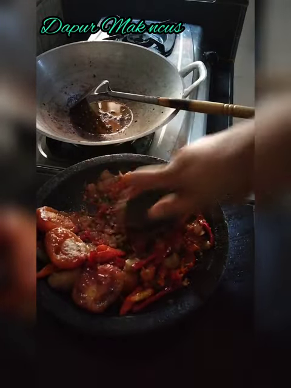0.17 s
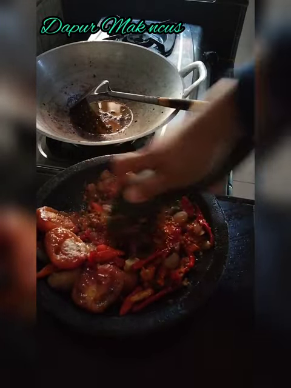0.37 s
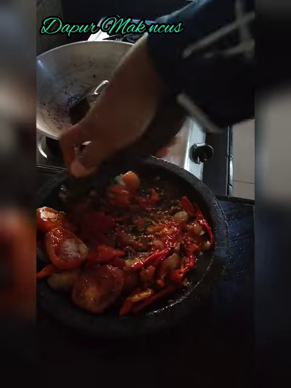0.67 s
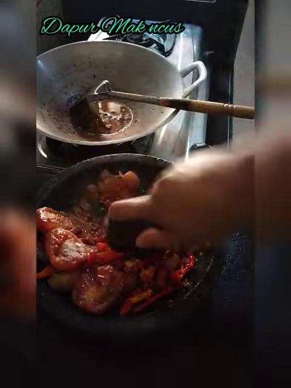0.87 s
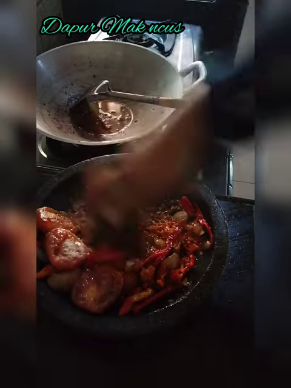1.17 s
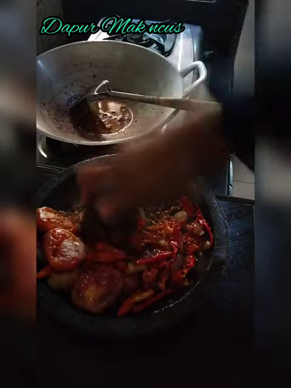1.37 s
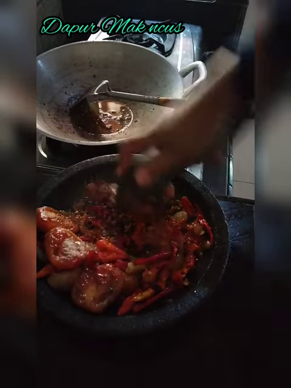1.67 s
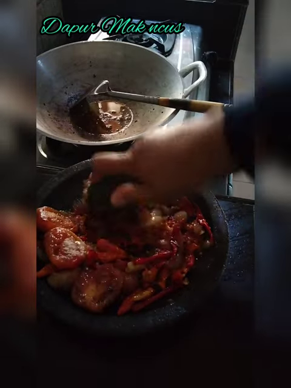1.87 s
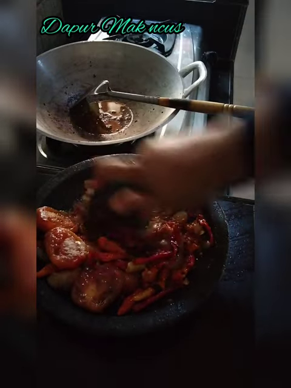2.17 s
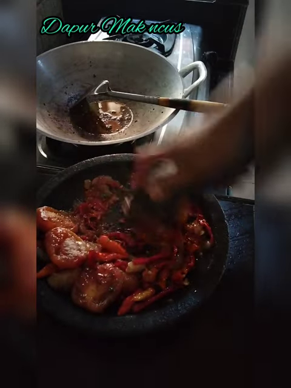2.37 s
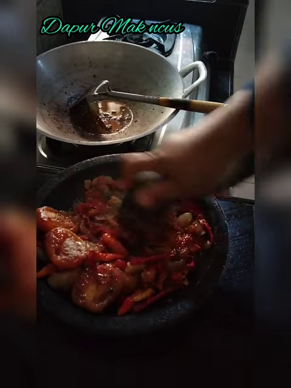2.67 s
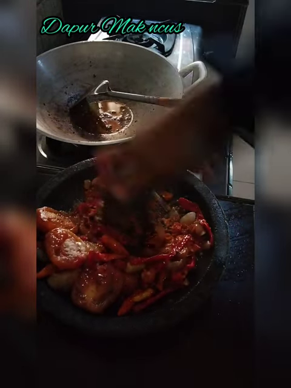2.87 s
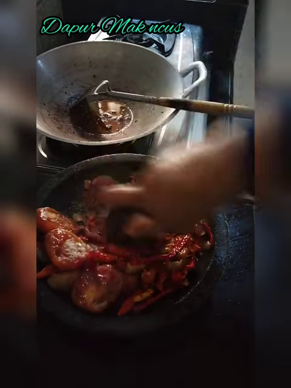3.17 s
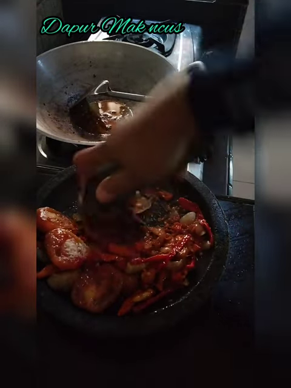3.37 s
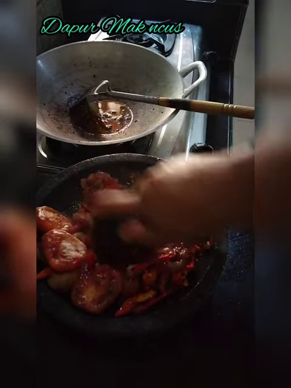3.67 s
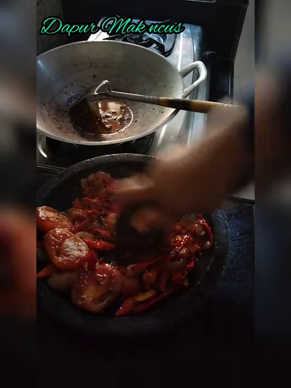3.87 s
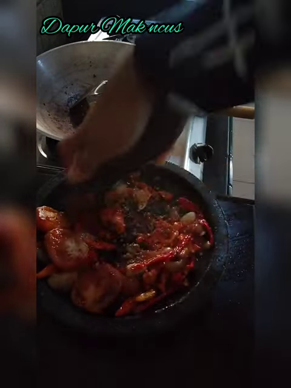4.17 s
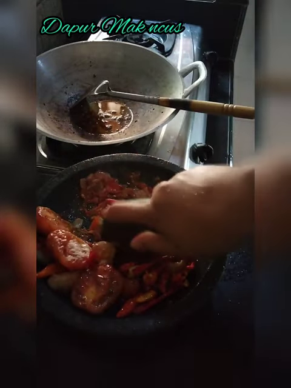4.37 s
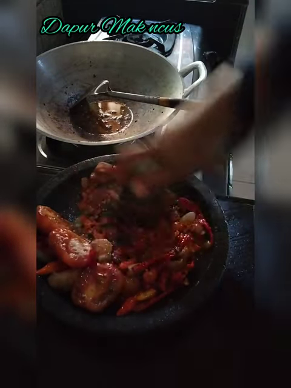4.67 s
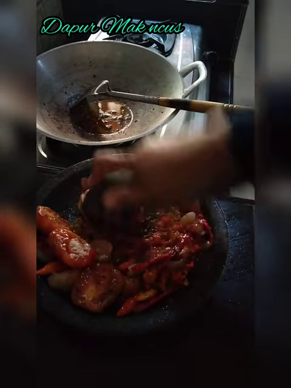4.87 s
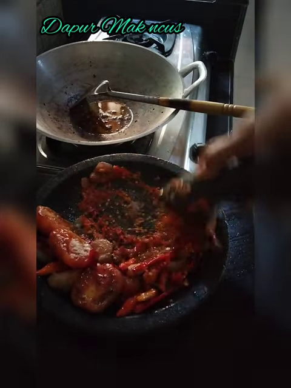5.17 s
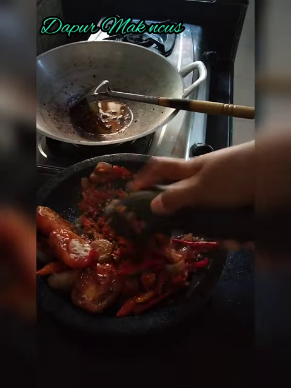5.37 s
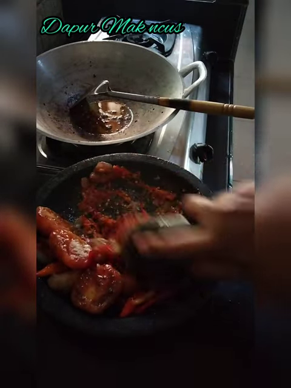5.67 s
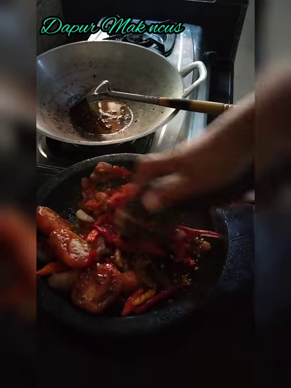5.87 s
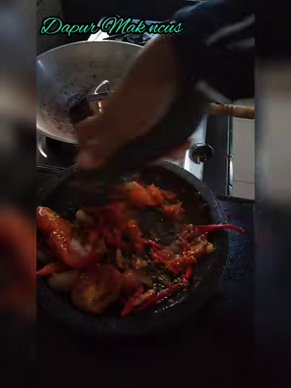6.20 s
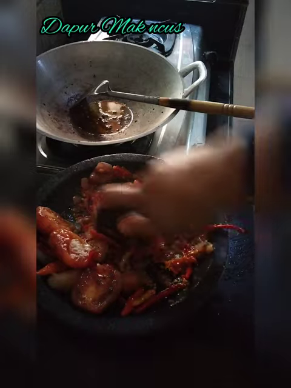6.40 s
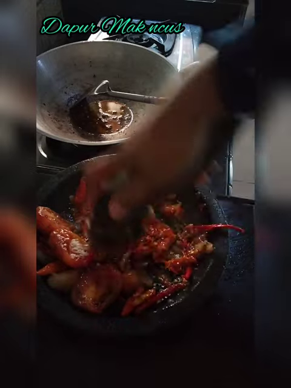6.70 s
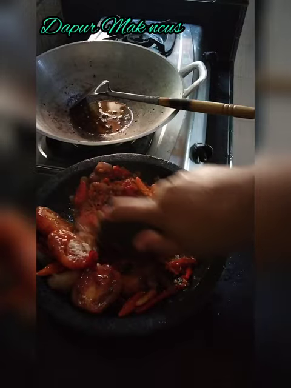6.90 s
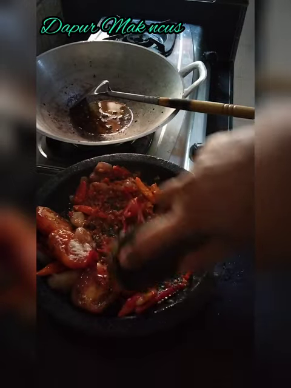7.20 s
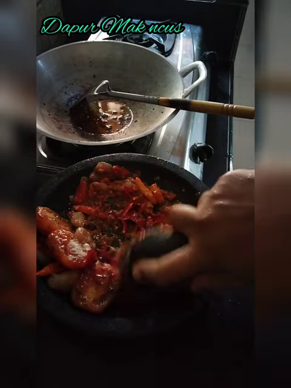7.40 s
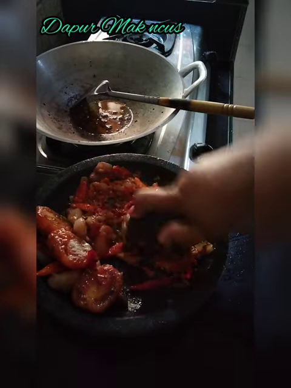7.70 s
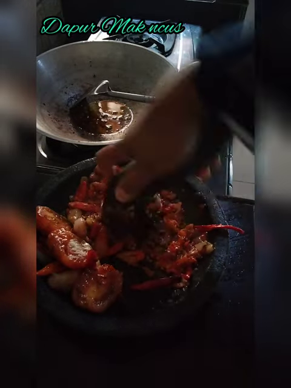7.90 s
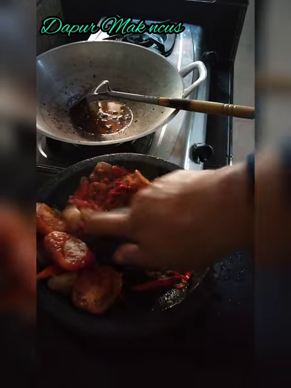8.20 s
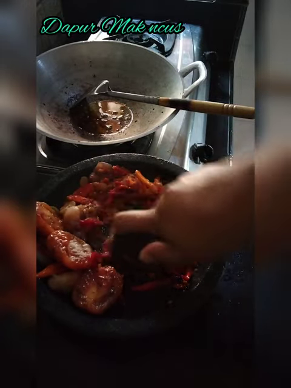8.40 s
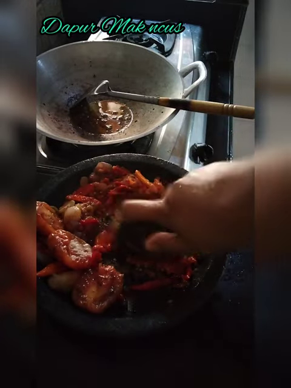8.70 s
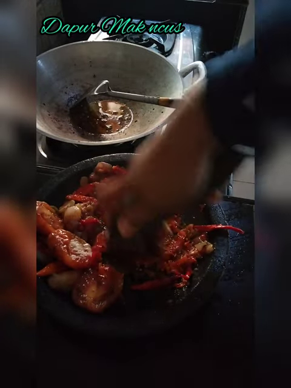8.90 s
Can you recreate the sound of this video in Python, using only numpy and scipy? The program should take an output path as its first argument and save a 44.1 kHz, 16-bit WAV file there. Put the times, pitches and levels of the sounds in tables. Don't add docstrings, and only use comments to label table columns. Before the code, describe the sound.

A stone pestle crushes wet, pulpy vegetables in a heavy stone mortar, squelching and scraping, with a few sharp, ringing stone knocks in a kitchen.

```python
import sys
import numpy as np
from scipy import signal
from scipy.fft import rfft, irfft, next_fast_len
from scipy.io import wavfile
from scipy.ndimage import uniform_filter1d, map_coordinates

SR = 44100
rng = np.random.default_rng(int(sys.argv[2]) if len(sys.argv) > 2 else 0)


def convert_level_to_amplitude(level_db):
    exponent = np.asarray(level_db, float) / 20
    return 10 ** exponent


def unload_wav(signal):
    wavfile.write(
        sys.argv[1],
        SR,
        np.round(np.clip(np.atleast_2d(signal).T, -1, 1) * 32767).astype(np.int16),
    )


N = 399105

# pitch_hz, level_db, t60_s (time to die away by 60 dB)
THUD_MODES = [(397, 1, 0.0078), (651, 4, 0.012), (850, 6.5, 0.011), (984, 7.5, 0.014), (1318, 2, 0.03)]
RING_MODES = [(1542, 5, 0.019), (1560, -18.5, 0.35)]
UPPER_MODES = [(1750, -12.5, 0.06), (2110, -2.5, 0.037), (2907, -2.5, 0.026), (2500, -10, 0.04),
               (5030, -22, 0.071)]
TOP_MODES = [(7430, 0.64, .06), (9300, -2, 0.028)]
RIM_MODES = [(3336, -6, 0.1), (3385, -5.5, 0.051)]
# opens_s, opening_time_s, starts_closing_s, closing_db_per_s, share the echo feels
GATE_STROKES = [(0.0, 0.03, 0.44, 125, .4), (0.573, 0.037, 0.87, 60, .4), (0.999, 0.021, 1.243, 194, .6),
                (1.412, .008, 2.082, 140, .3), (2.22, 0.002, 2.69, 140, .45),
                (2.891, 0.0022, 3.22, 224, .05), (3.33, 0.063, 3.9, 205, .5),
                (4.039, 0.018, 4.725, 148, .5), (4.948, 0.01, 5.14, 197, .6),
                (5.419, 0.021, 5.955, 170, .6), (6.138, 0.0088, 6.45, 187, .6),
                (6.631, 0.014, 6.9, 174, .6), (7.169, 0.0016, 7.77, 159, .25),
                (7.931, 0.0065, 8.66, 229.5, .6), (8.799, 0.0016, 8.99, 202, .6)]
# squelch_db, fizz_db, dull_scrape_db, bowl_ring_db, opening_burst_db
STROKE_LEVELS = [(-65.5, -68, -78, -70.5, -79), (-65, -66.5, -64, -67, -62), (-68, -67.5, -67, -77, -55),
                 (-68, -68, -88, -66, -62), (-65.5, -68, -71.5, -67.5, -72),
                 (-68.5, -64.5, -61.5, -76, -52), (-68.5, -71, -72, -69, -80),
                 (-68, -67.5, -70, -72.5, -84), (-67, -65, -84, -76, -52), (-69.5, -67.5, -83, -72, -68),
                 (-67, -68, -74, -75, -51.5), (-68, -72, -82.5, -70.5, -50),
                 (-68.5, -71, -69.5, -75, -66.5), (-66, -67, -76, -82, -45.5), (-65, -66, -80, -71, -49.5)]


def unit(x):
    return x / np.sqrt(np.mean(x ** 2) + 1e-20)


def along(points, hz):
    f, v = np.transpose(points)
    return np.interp(np.log(hz + 1), np.log(f + 1), v)


def wobble(rate):
    knots = rng.standard_normal(int(N * rate / SR) + 4)
    return map_coordinates(knots, [np.arange(N) * rate / SR], order=1)


def filtered(x, response):
    m = next_fast_len(N + SR // 2)
    return irfft(rfft(x, m) * response(np.fft.rfftfreq(m, 1 / SR)), m)[:N]


def clock():
    return np.arange(0, N + 32, 32) / SR


def smooth(gain):
    return np.interp(np.arange(N) / SR, clock(), gain)


def patchy(x, depth_db, bins=8, frames=10):
    z = signal.stft(x, nperseg=512)[2]
    field = uniform_filter1d(rng.standard_normal(z.shape), size=bins, axis=0)
    field = uniform_filter1d(field, size=frames, axis=1)
    return signal.istft(z * convert_level_to_amplitude(depth_db * unit(field)), nperseg=512)[1][:N]


def grit(spike_db, clump_db, clump_rate):
    size = convert_level_to_amplitude(spike_db * rng.exponential(size=N) + clump_db * wobble(clump_rate))
    return rng.standard_normal(N) * size


def crunch(hz, spread, cycles, count):
    when, pitch, size = rng.random(count), rng.standard_normal(count), rng.exponential(size=count)
    f = np.clip(hz * np.exp(spread * pitch), 900, 15000)[:, None]
    k = np.arange(200)
    grain = np.exp(-k * f / SR / cycles) * np.sin(2 * np.pi * f * k / SR)
    grain = convert_level_to_amplitude(4.5 * np.minimum(size, 3))[:, None] * grain
    place = (when * N).astype(int)[:, None] + k
    return unit(np.bincount(place.ravel(), grain.ravel(), N + 200)[:N])


def ringing(modes, t, scatter_db=0):
    swing = rng.standard_normal(len(modes)) * scatter_db
    return sum(convert_level_to_amplitude(db + d - 60 * t / t60) * np.sin(2 * np.pi * hz * t)
               for (hz, db, t60), d in zip(modes, swing))


def rub(drive, modes):
    answer = ringing(modes, np.arange(SR // 8) / SR)
    return signal.fftconvolve(drive, answer / np.linalg.norm(answer))[:N]


def closing():
    opens, takes, holds, rate, _ = np.transpose(GATE_STROKES)
    t = clock()
    k = np.maximum(np.searchsorted(opens, t, "right") - 1, 0)
    since = t - opens[k]
    reached_db = np.clip(rate * (np.append(opens[1:], N / SR) - holds), 0, 45)
    left_db = reached_db[k - 1] * np.clip(1 - since / takes[k], 0, 1)
    return -np.clip(rate[k] * (t - holds[k]), 0, 45) - left_db, k, since


def gate():
    shut_db, k, since = closing()
    rows = np.array(GATE_STROKES)
    still_opening = since < rows[k, 1]
    return convert_level_to_amplitude(rows[k - still_opening, 4] * shut_db)


def effort(steady_db, rows, rise, fall):
    t, (s, *peak_db) = clock(), np.transpose(rows)[..., None]
    slope = np.where(t < s, -rise, fall)
    peaks = np.sum(convert_level_to_amplitude(2 * (peak_db - slope * (t - s))), axis=1)
    return np.sqrt(convert_level_to_amplitude(2 * steady_db) + peaks)


def grit_gains():
    # start_s, scrape_db, ring_db
    bites = [(0.097, -55, -56), (0.379, -56.5, -71), (.6, -64, -54), (.84, -58, -70), (1.064, -57, -63),
             (1.657, -58, -52), (1.95, -66, -65), (2.051, -54.5, -53.5), (2.676, -71, -69),
             (3.549, -56.5, -53.5), (4.06, -67, -56), (4.334, -55.5, -66), (4.65, -67, -66),
             (5.45, -75.5, -69), (5.89, -75, -76), (6.15, -69, -65.5), (6.39, -65, -69), (6.81, -75.5, -63),
             (7.3, -52.5, -81), (7.7, -75.5, -72), (8.312, -59.5, -73), (8.63, -69.5, -82.5),
             (8.991, -69, -74)]
    shut_db, k, _ = closing()
    steady_db = np.array(STROKE_LEVELS)[k, 2:4].T
    scrape, ring = effort(steady_db, bites, rise=243, fall=350)
    return scrape * convert_level_to_amplitude(2.8 * shut_db), ring * convert_level_to_amplitude(shut_db)


def pulp_gains():
    # start_s, squelch_db, fizz_db
    pushes = [(.092, -57.5, -60.5), (.21, -49.5, -65), (.39, -65, -59), (0.632, -57, -58.5),
              (.74, -54, -62.5), (.83, -59, -60), (1.046, -52.5, -59.5), (1.17, -58, -62),
              (1.631, -54, -65), (1.84, -58, -58), (2.055, -60, -59.5), (2.4, -51.5, -68),
              (2.53, -54.5, -63), (3.488, -51, -58.5), (3.547, -57.5, -59.5), (3.724, -58, -57),
              (3.853, -64, -60.5), (4.135, -52, -64.5), (4.299, -52, -56.5), (4.5, -53.5, -65),
              (4.559, -60.5, -59), (4.67, -60.5, -58.5),
              (5.447, -56.5, -56), (5.53, -61, -70), (5.61, -59.5, -67), (5.701, -63, -71),
                   (5.79, -67, -62), (5.876, -60.5, -63), (6.25, -64, -65.5), (6.311, -55.5, -72),
                   (6.42, -70, -67.5), (6.761, -59.5, -63.5), (7.269, -56.5, -55), (7.331, -52, -54.5),
                   (7.42, -56.5, -65.5), (7.545, -57, -63.5), (7.683, -59, -58.5), (8.068, -52, -62.5),
                   (8.15, -56.5, -67), (8.207, -58.5, -59.5), (8.315, -53.5, -62), (8.45, -68, -72),
                   (8.617, -61.5, -61), (8.97, -61.5, -61)]
    shut_db, k, since = closing()
    steady = np.array(STROKE_LEVELS)[k].T
    burst = convert_level_to_amplitude(steady[4] - 710 * since)
    gains = effort(steady[:2], pushes, rise=460, fall=270)
    return [np.hypot(g, burst) * convert_level_to_amplitude(shut_db) for g in gains]


def leg_gains():
    # start_s, shake_db, lean_to_deep_db, upper_rattle_db
    load = [(0, -64.5, 4, -2), (.2, -64.5, -1.5, 1.5), (1.02, -58, 0, -2), (1.55, -65.5, -9.5, -8.5),
            (2.301, -60, 0.5, 1), (3.8, -64.5, -0.5, -2), (3.97, -70, -9, 0.5), (4.1, -63.5, 10, 6),
            (4.66, -59.5, -3, -2.5), (4.96, -66, 10, -19), (5.37, -82, 5, -5), (5.499, -69, -5, -11),
            (6.15, -67, 10, -3.5), (6.75, -66, 6.5, -15.5), (7.17, -60, 8.5, 5), (7.8, -66, 8.5, -10.5),
            (8.05, -84, 4, 0), (8.38, -69.5, 0.5, 1)]
    # start_s, lightest_s, back_s, level_db
    slump = (8.64, 8.77, 8.92, -13)
    t, (s, *cols) = clock(), np.transpose(load)
    shake_db, lean_db, rattle_db = [np.interp(t, s, c) for c in cols]
    shake_db = shake_db + np.interp(t, slump[:3], [0, slump[3], 0])
    shut_db = closing()[0]
    deep = convert_level_to_amplitude(shake_db - 2.5 + lean_db + 0.29 * shut_db)
    middle = convert_level_to_amplitude(shake_db - 2 + 0.24 * shut_db)
    upper = convert_level_to_amplitude(shake_db - 6 - lean_db + 0.4 * shut_db)
    return deep, middle, np.hypot(upper * convert_level_to_amplitude(rattle_db), convert_level_to_amplitude(-7) * grit_gains()[0])


def sizzle():
    # start_s, peak_db, length_s
    hisses = [
        (6.067, -72, 0.17),
        (7.036, -84.5, 0.2),
        (7.682, -74.5, 0.23),
    ]
    band = filtered(rng.standard_normal(N), lambda hz: np.exp(-((hz - 7350) / 260) ** 2))
    t, swell = np.arange(N) / SR, np.zeros(N)
    for s, db, length in hisses:
        shape_db = np.interp((t - s) / length, [0, .2, 1, 1.1], [-8, 3.0, -16.5, -63.0], left=-60)
        swell += convert_level_to_amplitude(db + shape_db)
    return swell * unit(band)


def kitchen(x):
    # pitch_hz, t60_s
    room_t60 = [(300, 0.29), (800, 0.93), (1500, 0.85), (3300, 0.76), (6000, 0.93)]
    out, step = np.zeros(N + 2 * SR), SR // 2
    for start in range(0, N, step):
        hz, t, z = signal.stft(rng.standard_normal(SR * 2 // 3), SR, nperseg=256)
        fade = convert_level_to_amplitude(-60 * t / along(room_t60, hz)[:, None]) * (1 - np.exp(-t / 0.0018))
        tail = signal.istft(z * fade, SR, nperseg=256)[1]
        echo = signal.fftconvolve(x[start:start + step], tail / np.linalg.norm(tail))
        out[start:start + len(echo)] += echo
    return out[:N]


def hollowed(x):
    # start_s, length_s, level_db, low_hz, top_hz
    hollows = [(0.87, 0.048, -1, 420, 1800), (1.398, 0.06, -16, 320, 1400), (1.45, 0.15, -17, 415, 770),
               (1.71, 0.049, 3, 450, 1200), (3.196, 0.25, -12, 420, 624), (4.95, .1, -14, 210, 680),
               (5.05, 0.16, -8, 270, 630), (5.42, 0.051, -5, 500, 1120), (5.67, 0.16, -12, 730, 1160),
               (6.63, 0.11, -8.5, 480, 790), (6.84, .25, -4, 770, 1200), (7.93, 0.098, -11.5, 190, 630),
               (8.42, .15, 0, 450, 1100), (8.788, 0.098, -16, 220, 1000), (5.002, 0.13, 14, 594, 710),
               (5.5, 0.13, 15, 530, 780), (5.44, 0.079, 7, 310, 410), (5.764, 0.24, 7, 350, 490),
               (5.86, 0.13, 4, 560, 890), (6.25, .14, 4.5, 810, 650), (6.3, .16, 9.5, 338, 500),
               (6.772, .2, 7.5, 720, 680), (7.93, .1, 5.5, 650, 610), (8.58, 0.091, 7.5, 490, 880),
               (8.886, 0.11, 5.5, 520, 890), (2.2, 0.23, -1.5, 330, 480), (2.852, .2, 2, 370, 480.3),
               (1.78, 0.12, 7, 310, 500), (3.33, .14, -10, 130, 320), (8.92, .15, 12, 36, 110),
               (4.76, 0.14, 9.5, 240, 360), (1.41, 0.051, -10, 3300, 7200), (2.8, 0.24, -11, 1730, 2840),
               (2.93, .3, 0.5, 620, 900), (2.14, 0.12, -6, 60, 370), (0.54, 0.042, 6, 3300, 10000),
               (4.86, .12, -8, 400, 600), (6.9, .22, -8, 380, 620), (7.72, .2, -8, 380, 620)]
    hz, t, z = signal.stft(x, SR, nperseg=1024)

    def inside(v, lo, hi, edge):
        return np.clip(np.minimum(v - lo, hi - v) / edge + .5, 0, 1)

    cut_db = 0
    for s, length, db, lo, hi in hollows:
        in_pitch = inside(hz, lo, hi, 55)[:, None]
        in_time = inside(t, s, s + length, 0.013)
        cut_db = cut_db + db * in_pitch * in_time
    return signal.istft(z * convert_level_to_amplitude(cut_db), SR, nperseg=1024)[1][:N]


def table():
    # pitch_hz, width_hz, level_db
    table_modes = [(75.2, 22, -7), (108, 14, -3), (147, 22, 1.5), (193.5, 31, -3), (256, 39, -14),
                   (382.5, 92, -13)]
    # start_s, peak_db, pitch_hz
    bumps = [
        (0.564, -44.5, 190),
        (1.023, -46.5, 364),
        (4.046, -51, 120),
        (4.632, -48, 374),
    ]
    t, out = np.arange(SR // 10) / SR, np.zeros(N)
    shake = patchy(rng.standard_normal(N), depth_db=4.5, bins=1, frames=12)
    groups = table_modes[:2], table_modes[2:4], table_modes[4:]
    for gain, modes in zip(leg_gains(), groups):
        shape = lambda hz: sum(convert_level_to_amplitude(db) * np.exp(-((hz - c) / w) ** 2) for c, w, db in modes)
        out += smooth(gain) * unit(filtered(shake, shape))
    for s, db, hz in bumps:
        out[round(s * SR):][:len(t)] += ringing([(hz, db, .06)], t)
    return out


def pulp():
    # pitch_hz, level_db per Hz
    squelch_color = [(350, -60), (710, -30), (1200, -9), (1550, 0), (1680, -6), (2560, -6.5), (2860, 0),
                     (3800, -8.5), (4940, -47.5), (8360, -120)]
    # pitch_hz, level_db per Hz
    fizz_color = [(700, -60), (2240, -26.5), (3800, -6), (4600, -1.5), (5940, -5), (7240, 1.5),
                  (10500, -12), (11500, -15.5), (13000, -12), (13800, -15.5), (14600, -10), (15800, -22)]
    squelch, fizz = map(smooth, pulp_gains())
    surge = convert_level_to_amplitude(2.0 * wobble(40))
    low = surge * grit(spike_db=3.2, clump_db=3.0, clump_rate=110)
    low = filtered(low, lambda hz: convert_level_to_amplitude(along(squelch_color, hz)))
    high = surge * grit(spike_db=2.5, clump_db=2.5, clump_rate=120)
    high = filtered(high, lambda hz: convert_level_to_amplitude(along(fizz_color, hz)))
    low = unit(patchy(low, depth_db=3.5, bins=4))
    low += convert_level_to_amplitude(-6.5) * crunch(hz=2450, spread=0.16, cycles=4.7, count=2500)
    high = unit(patchy(high, depth_db=3.0, bins=8))
    high += convert_level_to_amplitude(-9.5) * crunch(hz=7460, spread=0.23, cycles=1.8, count=2500)
    return squelch * unit(low) + fizz * unit(high)


def pops():
    # start_s, peak_db, pitch_hz, treble_db
    skin_pops = [(0.024, -42.5, 2080, -25), (0.6158, -42, 2140, -16), (0.738, -39, 2850, -15.5),
                 (0.7822, -36, 1920, -26.5), (0.8091, -36, 3060, -19), (0.827, -36.5, 3100, -17),
                 (1.03, -54, 2830, -30), (1.164, -42, 3350, -21.5), (1.621, -35.5, 1984, -11.5),
                 (1.772, -42.5, 1932, -21.5), (4.9585, -29, 2546, -29), (1.9936, -37, 2070, -15.5),
                 (2.581, -33.5, 1880, -18.5), (2.6705, -45.5, 2920, -16.5), (2.9104, -35.5, 3200, -10.5),
                 (3.0753, -38, 2950, -19.5), (3.4798, -30.5, 2260, -20.5), (3.54, -35, 1690, -18),
                 (4.292, -33.5, 2780, -22), (4.351, -41, 3100, -21), (5.0535, -38, 2960, -23),
                 (5.4489, -33.5, 3100, -26), (6.3122, -50.5, 3200, -12), (6.8829, -37, 2630, -36.5),
                 (7.2462, -42, 2770, 0), (7.2702, -34, 2220, -15.5), (7.938, -37, 3000, -22),
                 (7.982, -38, 3740, -21), (8.0604, -43, 3400, -25), (8.2922, -40.5, 3010, -18.5),
                 (8.7994, -39.5, 1970, -20)]
    # start_s, peak_db
    seeds = [
        (1.514, -39),
        (1.951, -44),
        (2.0497, -38.5),
        (6.1496, -43.5),
        (7.32, -35.5),
    ]
    # start_s, peak_db, pitch_hz
    more_pops = [(0.0758, -56, 2790), (0.175, -44, 2990), (0.191, -37, 2790), (0.2039, -38, 2960),
                 (0.226, -35.5, 2800), (0.3014, -45, 2770), (0.3802, -34, 2670), (0.5906, -48, 1835),
                 (1.0066, -49, 3030), (1.0291, -34.5, 2800), (1.478, -48, 2600), (1.5863, -45.5, 2540),
                 (1.7506, -57, 4500), (2.086, -50, 2600), (2.298, -42.5, 5500), (2.408, -44, 4500),
                 (2.443, -46.5, 4430), (2.6552, -49, 4970), (2.692, -48, 4500), (2.5267, -44, 1970),
                 (2.5525, -40, 2810), (3.131, -41.5, 1820), (3.2038, -50, 3040), (3.4593, -41, 2750),
                 (3.6641, -46, 2790), (3.7125, -41.5, 2770), (3.8182, -41, 2600), (3.846, -46, 2600),
                 (4.2384, -46, 2800), (4.3196, -36.5, 2980), (4.6138, -42, 2760), (4.481, -47, 3000),
                 (4.502, -41, 3200), (4.54, -42, 3000), (4.6308, -43, 2800), (4.6808, -44, 6500),
                 (4.9596, -27, 7400), (5.1672, -62, 8100), (5.437, -49, 2580), (5.501, -48, 3310),
                 (5.6164, -49, 2800), (5.697, -47.5, 3030), (5.7947, -43.5, 2340), (5.8446, -52, 7490),
                 (5.863, -48.5, 2800), (6.353, -42, 2050), (6.648, -44, 3000), (6.8707, -43, 2760),
                 (7.3396, -50, 3020), (7.432, -51, 2780), (7.5338, -43, 2780), (7.562, -45.5, 3000),
                 (7.673, -40, 2800), (8.1354, -50, 2800), (8.1793, -45, 2390), (8.5664, -49, 7340),
                 (8.673, -49, 3300), (8.99, -42, 2920)]
    events = skin_pops + [(s, db, 7140, -14.5) for s, db in seeds] + [(s, db, hz, -24) for s, db, hz in more_pops]
    out, t = np.zeros(N + SR), np.arange(SR // 40) / SR
    for s, db, hz, treble_db in events:
        spit = np.diff(rng.standard_normal(len(t) + 2), 2) / 2.0
        band = signal.butter(2, [hz / 1.5, min(hz * 1.236, SR / 2.2)], "band", fs=SR)
        pocket = signal.lfilter(*band, rng.standard_normal(len(t)))
        burst = convert_level_to_amplitude(8.0) * unit(pocket) + convert_level_to_amplitude(treble_db + 10) * spit
        fade = convert_level_to_amplitude(db - 13.5 - 60 * t / 0.016) * (1 - np.exp(-t / 0.00054))
        out[round(s * SR):][:len(t)] += fade * burst
    return out[:N]


def grind():
    # pitch_hz, width_hz, level_db below the ring
    grain_bands = [(2100, 80, -12), (2850, 100, -10), (3370, 80, -12.5)]
    scrape, ring = map(smooth, grit_gains())
    contacts = unit(patchy(grit(spike_db=2.0, clump_db=2.0, clump_rate=54), depth_db=4))
    no_bass = signal.butter(4, 460, "high", fs=SR, output="sos")
    thin = signal.sosfilt(no_bass, rub(scrape * contacts, THUD_MODES[1:]))

    def shape(hz):
        return sum(convert_level_to_amplitude(db) * np.exp(-((hz - c) / w) ** 2) * np.sqrt(SR / w / 4.7) for c, w, db in grain_bands)

    bands = filtered(contacts, shape)
    return thin + rub(ring * contacts, RING_MODES[:1]) + ring * bands


def skids():
    # start_s, length_s, ring_db, thud_db, upper_db (the last two beside the ring)
    slides = [
        (0.174, 0.0085, -54, -6, -4),
        (0.183, 0.033, -45.5, 1.5, -7),
        (0.222, 0.041, -42.5, 0, -5.5),
        (0.294, 0.017, -60.5, -13, 7.5),
        (1.785, 0.023, -49.5, -1.5, -8),
        (1.81, 0.069, -39, -5, -14),
        (2.521, 0.019, -49.5, 3.5, -11),
        (2.539, 0.033, -50, -3.5, -6),
    ]
    drive = np.zeros((3, N))
    for s, length, db, thud_db, upper_db in slides:
        swell = np.sin(np.linspace(0, np.pi, round(length * SR))) ** .5
        level_db = db + np.array([[0], [thud_db], [upper_db]])
        drive[:, round(s * SR):][:, :len(swell)] += convert_level_to_amplitude(level_db) * swell
    ring, thud, upper = drive * unit(grit(spike_db=-0.5, clump_db=-1.0, clump_rate=140))
    low = rub(ring, RING_MODES[:1]) + rub(thud, THUD_MODES)
    high = rub(upper, UPPER_MODES[1:] + RIM_MODES)
    return low + high + convert_level_to_amplitude(-17.5) * rub(upper, UPPER_MODES[-1:] + TOP_MODES)


def slaps():
    # start_s, level_db, pitch_hz, t60_s
    wall_modes = [(2.2187, -12, 2110, .012), (2.2186, -21, 370, .018), (2.2184, -16, 970, .016),
                  (2.2188, -14, 2907, .012), (2.2183, -20, 600, .015), (2.2186, -13, 1553, .013),
                  (2.2186, -37, 4940, .01), (2.8911, -26.5, 596, 0.024), (2.8914, -25.5, 1330, 0.04),
                  (2.8911, -26, 403, 0.031), (2.8911, -28, 825, .025), (2.905, -32.5, 599, .03),
                  (7.1699, -28, 770.4, 0.026), (7.196, -40, 730, .045), (1.824, -37, 420, .05),
                  (1.83, -38, 550, .06), (1.85, -40, 430, .05), (2.527, -39, 677, 0.061),
                  (1.029, -49, 516, .03), (4.32, -47.5, 496, .04), (4.959, -49, 640, .03),
                  (7.172, -41, 1558, .7), (2.222, -39, 1556, 1.1)]
    out, t = np.zeros(N), np.arange(SR * 2 // 3) / SR
    for s, db, hz, t60 in wall_modes:
        push = ringing([(hz, db, t60)], t) * (1 - np.exp(-t / 0.00027))
        out[round(s * SR):][:len(t)] -= push
    return out


def bounce():
    # start_s, ring_db, thud_db, rim_db (the last two beside the ring)
    touch = (7.1955, -35, -2, -3)
    s, db, thud_db, rim_db = touch
    out, t = np.zeros(N), np.arange(SR // 8) / SR
    ring = ringing([(1560, -1.7, .09)], t)
    ring += convert_level_to_amplitude(thud_db - 7.5) * ringing(THUD_MODES[1:4], t)
    ring += convert_level_to_amplitude(rim_db) * ringing(RIM_MODES[1:] + [(5350, -25.5, .04), (2800, -12, .04)], t)
    out[round(s * SR):][:len(t)] = convert_level_to_amplitude(db) * ring * (1 - np.exp(-t / 0.0011))
    return out


def knocks():
    # start_s, ring_db, thud_db, wall_db, echo_db (the last three beside the ring)
    blows = [
        (0.3809, -51, 6.5, -5, -6.5),
        (1.823, -31.5, -4, -13, -9.5),
        (2.2187, -15, -19, -9.5, -6),
        (2.8913, -15.5, -9, -21, -6.5),
        (3.8663, -42, -16, -16, -16),
        (4.3101, -46, -13, -4, -16),
        (4.4455, -36.5, -26, -10, -9.5),
        (4.959, -47.5, -32, -20.5, -7),
        (7.1699, -12.5, -17.5, -37.5, -13.5),
    ]
    # ring_hz, ring_t60_s, contact_s, high_mode_hz, high_mode_db below the ring
    landings = [(1550, 0.032, 0.00087, 5030, -50), (1550, .05, 0.00086, 5030, -40),
                (1553, 0.079, 0.0003, 5020, -40), (1551, 0.038, 0.00093, 5362, -33.5),
                (1570, 0.059, 0.0014, 5030, -45), (1539, .043, 0.0013, 5030, -50),
                (1558, 0.048, .0025, 5030, -47), (1560, 0.054, 0.0012, 5030, -43),
                (1555, 0.066, 0.0017, 4900, -52.5)]
    out, t = np.zeros((2, N + SR)), np.arange(SR // 3) / SR
    below_rim = signal.cheby2(10, 50, 3750, fs=SR, output="sos")
    no_bass = signal.butter(2, 650, "high", fs=SR)
    for (s, db, thud_db, wall_db, echo_db), (hz, t60, contact, high_hz, high_db) in zip(blows, landings):
        onset = 1 - np.exp(-t / contact)
        ring = ringing([(hz, RING_MODES[0][1], t60)], t) * onset
        ring += convert_level_to_amplitude(high_db - 60 * t / .06) * np.sin(2 * np.pi * high_hz * t)
        ring += convert_level_to_amplitude(wall_db) * ringing(RING_MODES[1:], t)
        ring += convert_level_to_amplitude(thud_db) * ringing(THUD_MODES, t, scatter_db=2)
        ring += convert_level_to_amplitude(wall_db) * ringing(UPPER_MODES, t, scatter_db=2)
        noise = signal.lfilter(*no_bass, rng.standard_normal(len(t)))
        crack = signal.sosfilt(below_rim, noise)
        crack_db = wall_db + np.array([[12], [22]]) - 60 * t / np.array([[.013], [.032]])
        ring = ring + convert_level_to_amplitude(crack_db) * crack
        ring += convert_level_to_amplitude(-6 + 0.55 * wall_db) * ringing(RIM_MODES, t)
        ring += convert_level_to_amplitude(-39.5) * ringing(TOP_MODES, t)
        level_db = db + np.array([[0], [echo_db]])
        out[:, round(s * SR):][:, :len(t)] += convert_level_to_amplitude(level_db) * ring * onset
    return out[:, :N]


def scene():
    thin = signal.butter(2, 280, "high", fs=SR, output="sos")
    blows, sent = signal.sosfilt(thin, -knocks())
    chatter = signal.sosfilt(thin, skids())
    slap = signal.sosfilt(thin, slaps())
    echo = smooth(gate()) * kitchen(sent + convert_level_to_amplitude(-9.5) * chatter + convert_level_to_amplitude(-9) * slap)
    soft = hollowed(echo + grind() + pulp() + pops() + table())
    return (blows + slap + chatter + soft + sizzle() + bounce())[None]


def top_cut(x):
    return signal.sosfilt(signal.butter(12, 16300, fs=SR, output="sos"), x)


def record(dry):
    cut = lambda hz: (1j * hz / (1j * hz + 60)) ** 3 * (hz < 15720)
    x = filtered(dry[0], cut)
    power = np.abs(uniform_filter1d(x ** 2, size=300))
    heard = x * power / (power + convert_level_to_amplitude(-99) ** 2)
    return top_cut(heard[None])


dry = scene()
out = record(dry)
unload_wav(out)
```